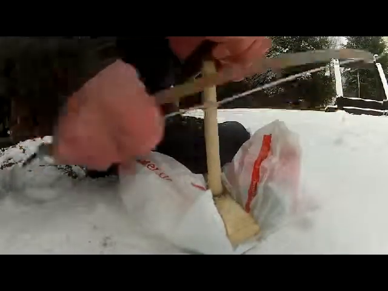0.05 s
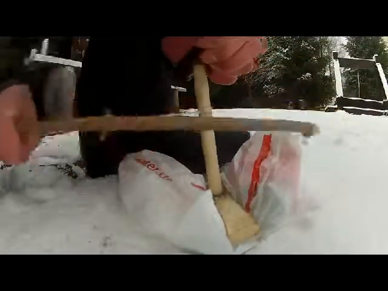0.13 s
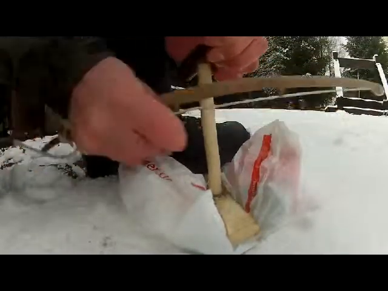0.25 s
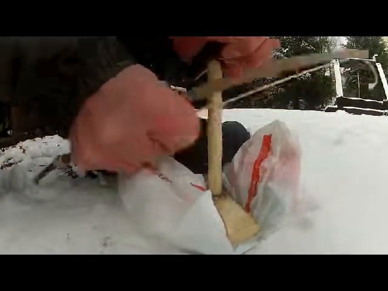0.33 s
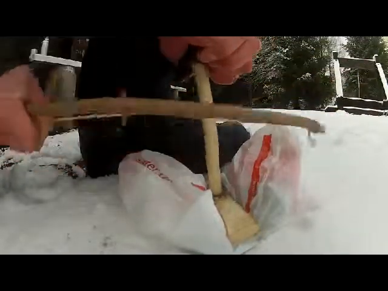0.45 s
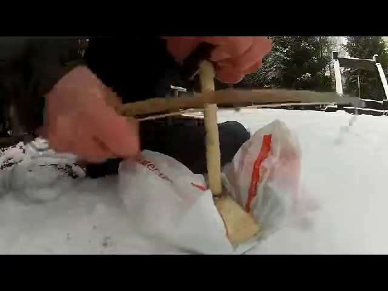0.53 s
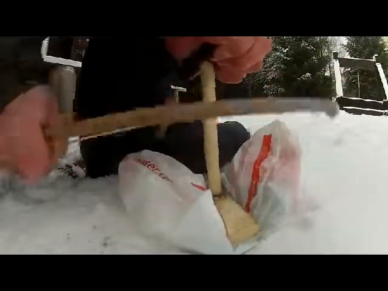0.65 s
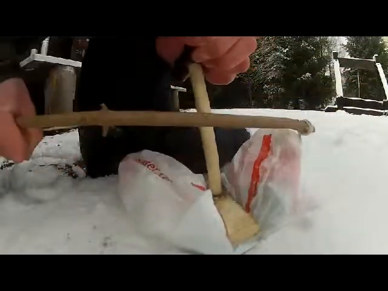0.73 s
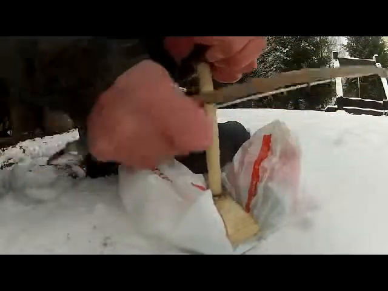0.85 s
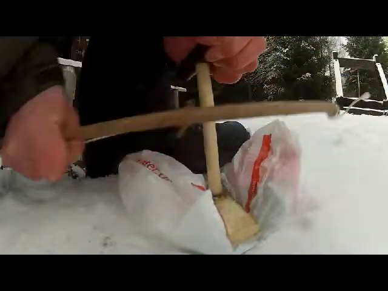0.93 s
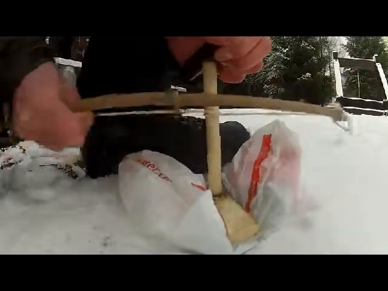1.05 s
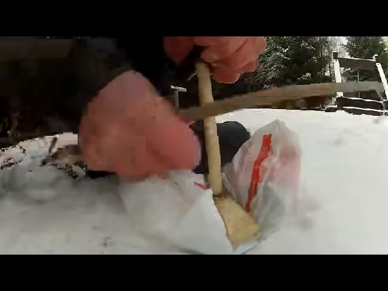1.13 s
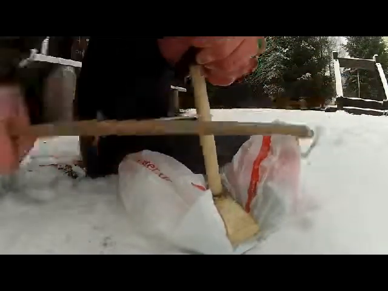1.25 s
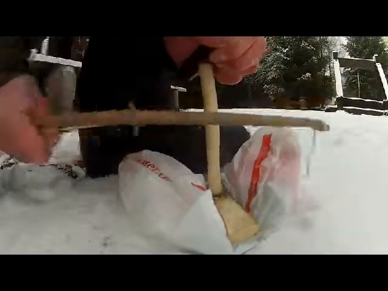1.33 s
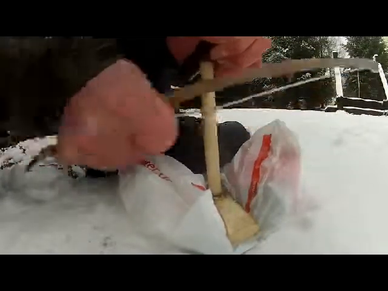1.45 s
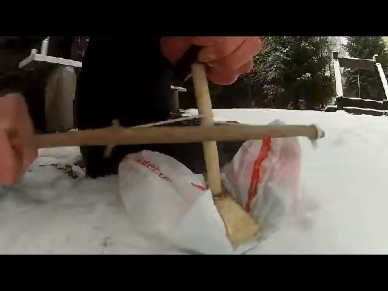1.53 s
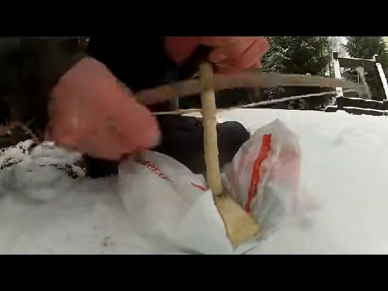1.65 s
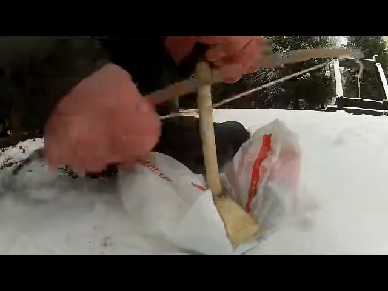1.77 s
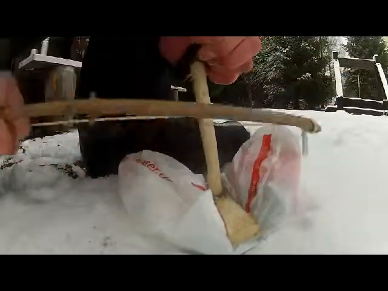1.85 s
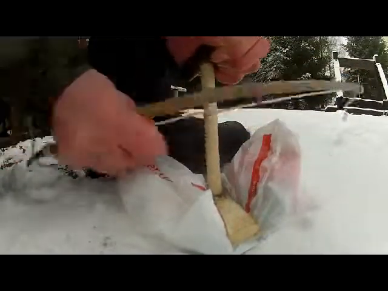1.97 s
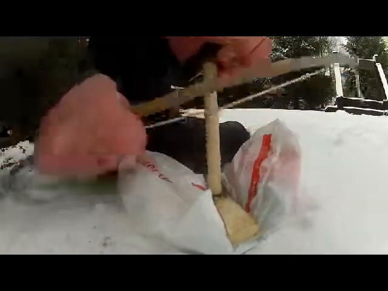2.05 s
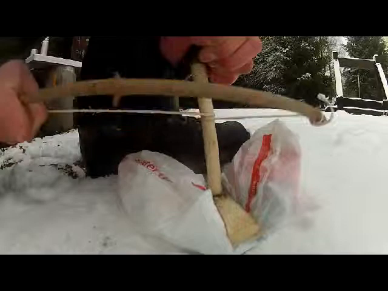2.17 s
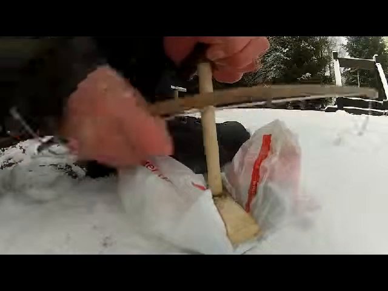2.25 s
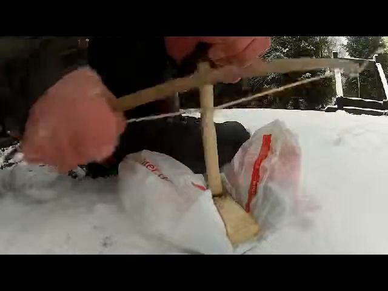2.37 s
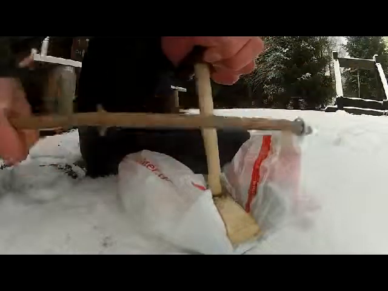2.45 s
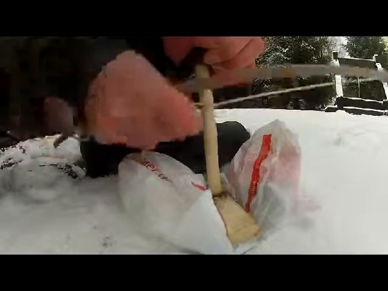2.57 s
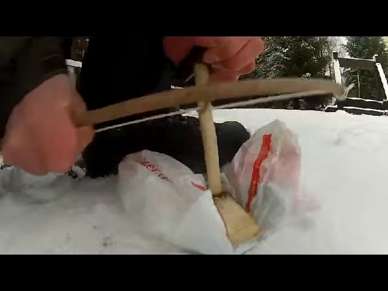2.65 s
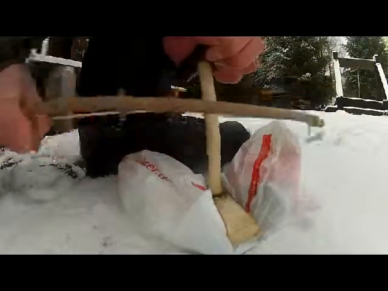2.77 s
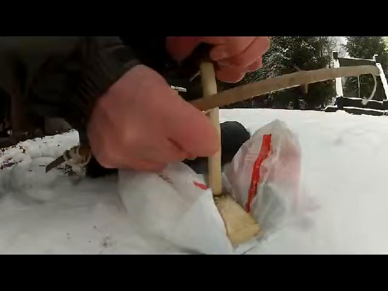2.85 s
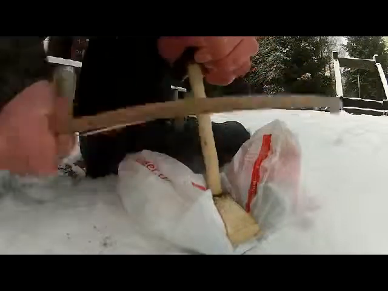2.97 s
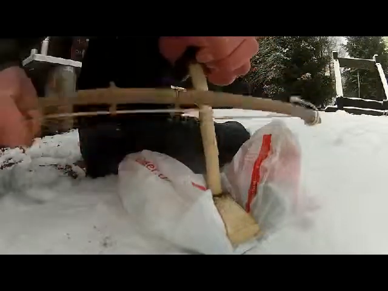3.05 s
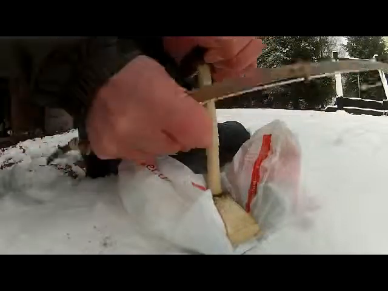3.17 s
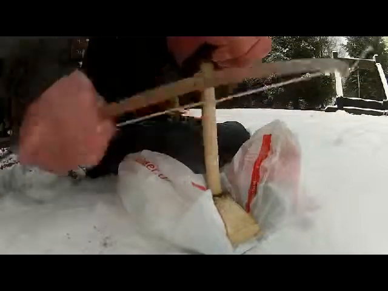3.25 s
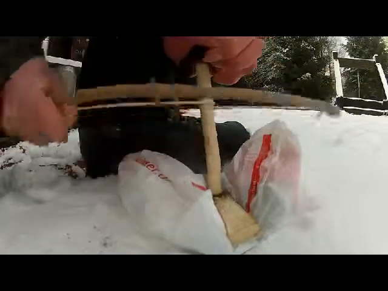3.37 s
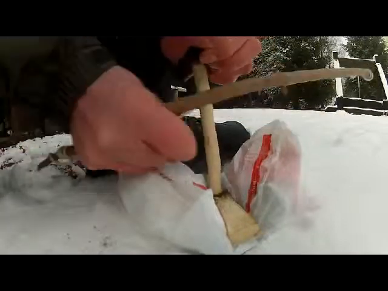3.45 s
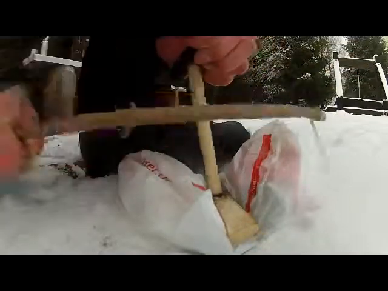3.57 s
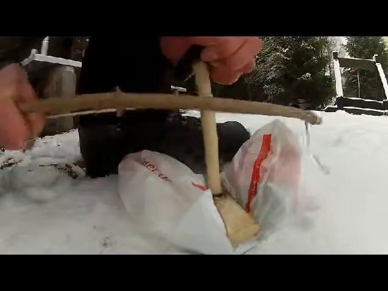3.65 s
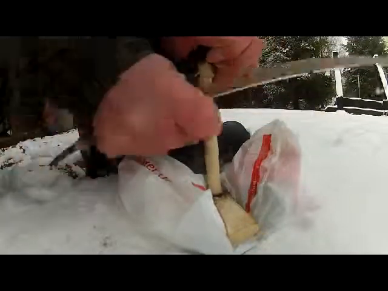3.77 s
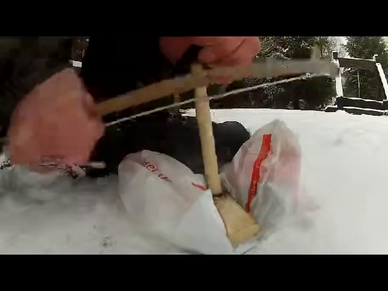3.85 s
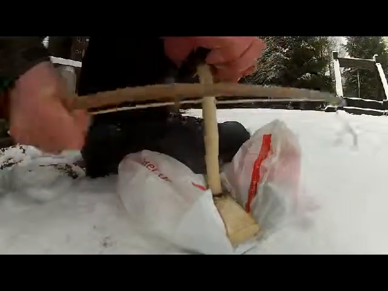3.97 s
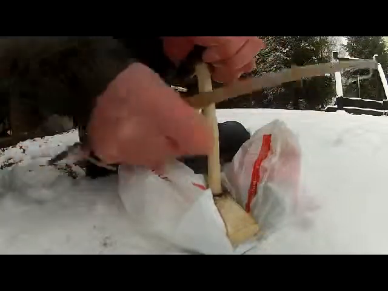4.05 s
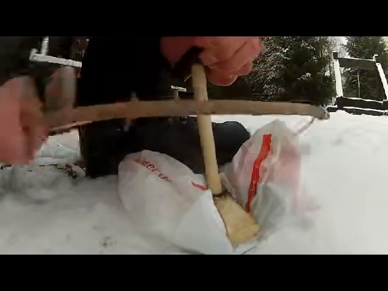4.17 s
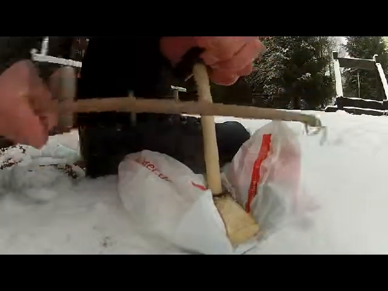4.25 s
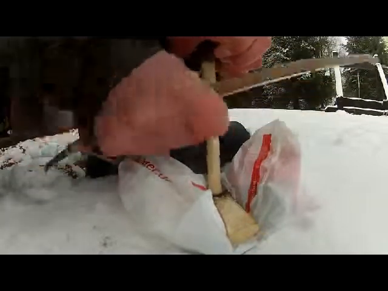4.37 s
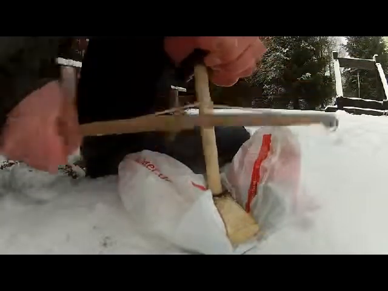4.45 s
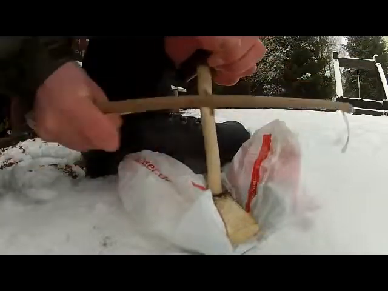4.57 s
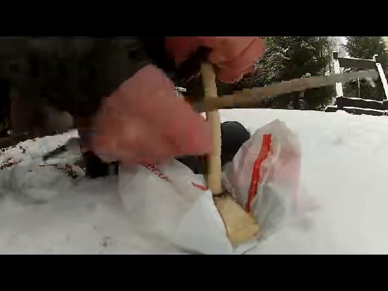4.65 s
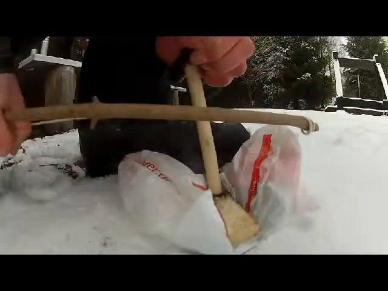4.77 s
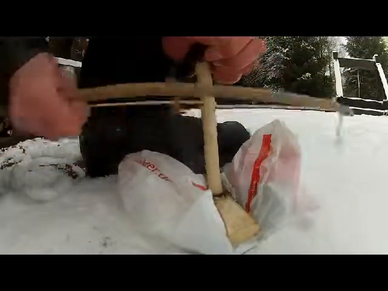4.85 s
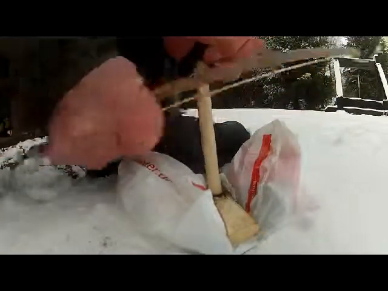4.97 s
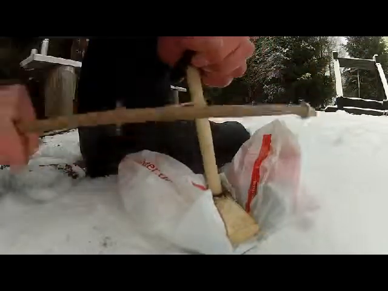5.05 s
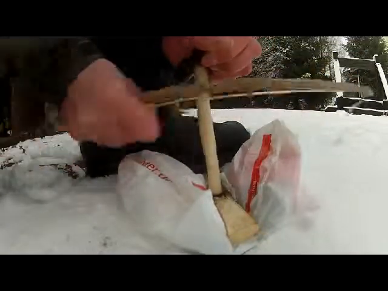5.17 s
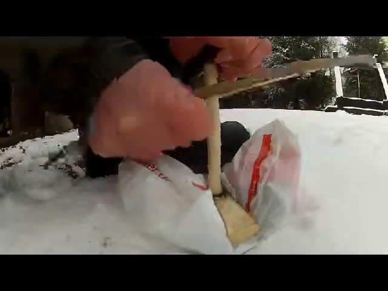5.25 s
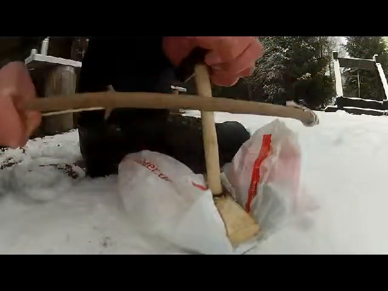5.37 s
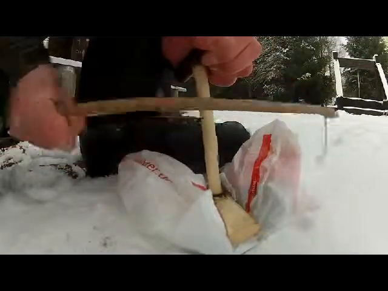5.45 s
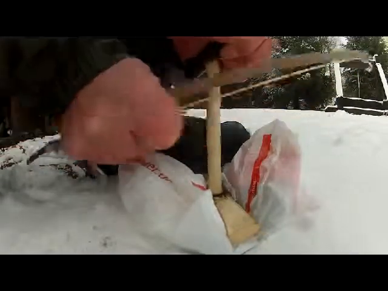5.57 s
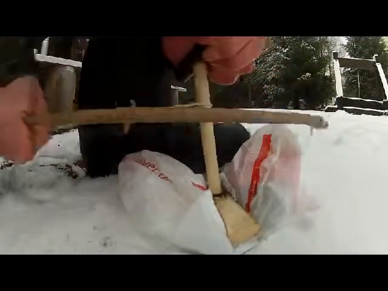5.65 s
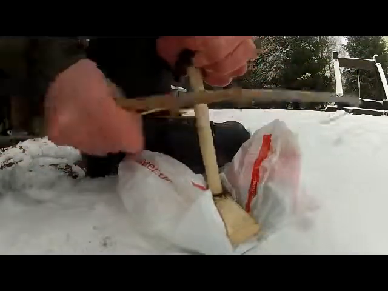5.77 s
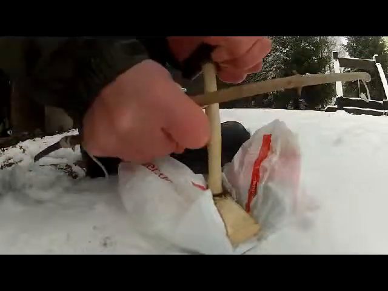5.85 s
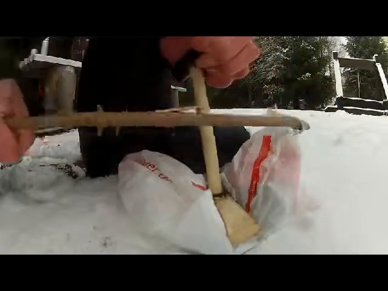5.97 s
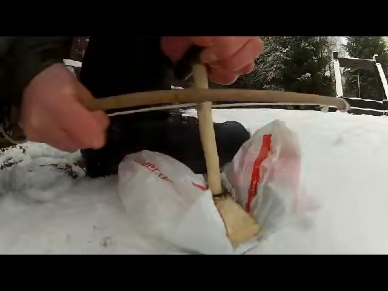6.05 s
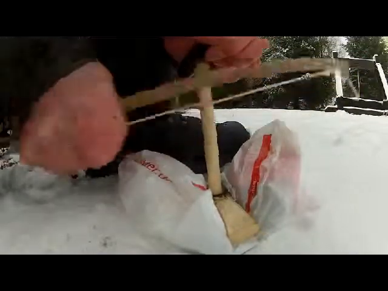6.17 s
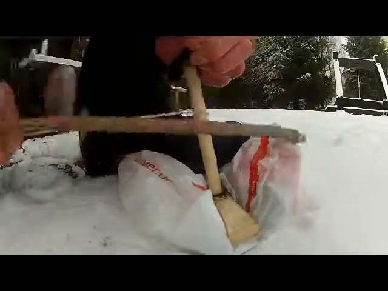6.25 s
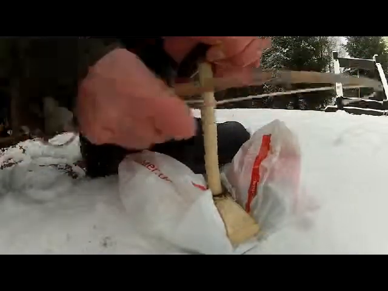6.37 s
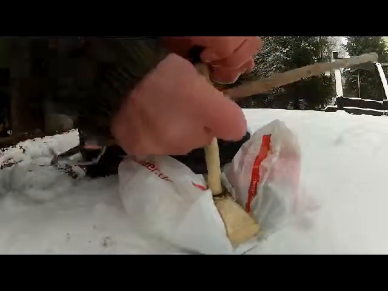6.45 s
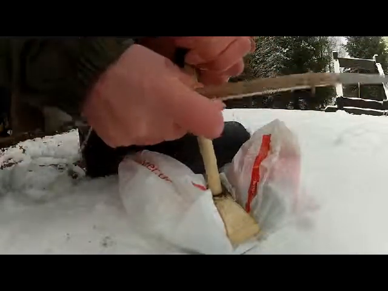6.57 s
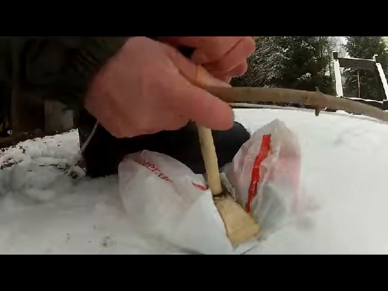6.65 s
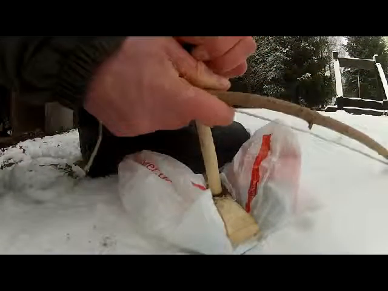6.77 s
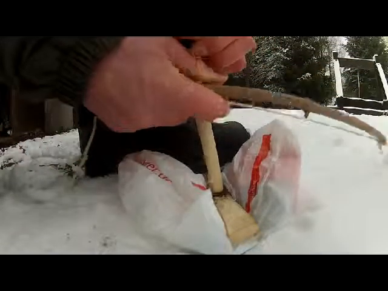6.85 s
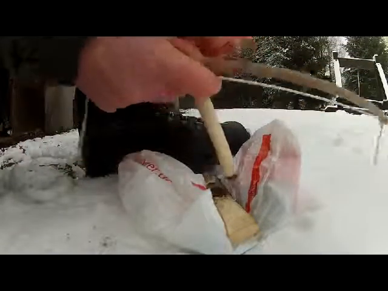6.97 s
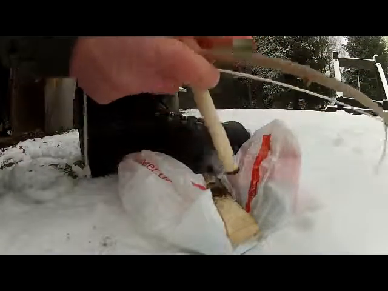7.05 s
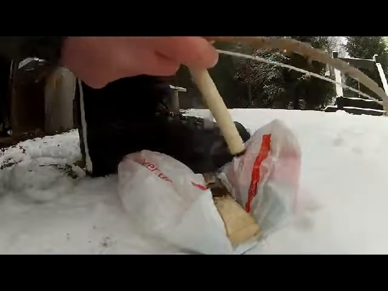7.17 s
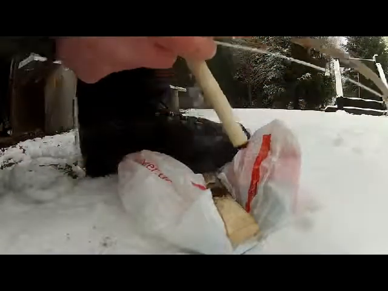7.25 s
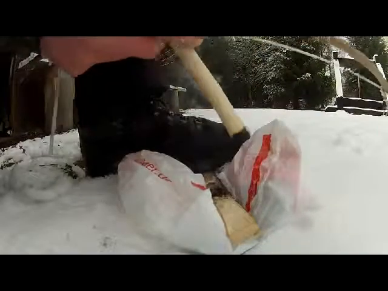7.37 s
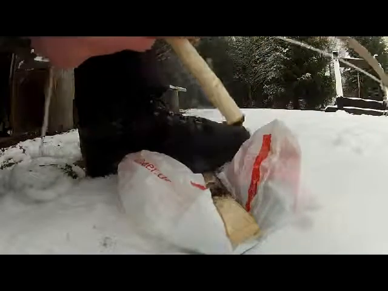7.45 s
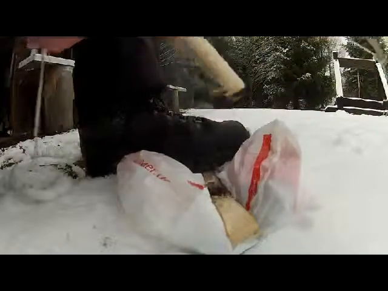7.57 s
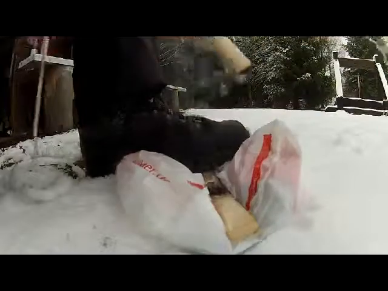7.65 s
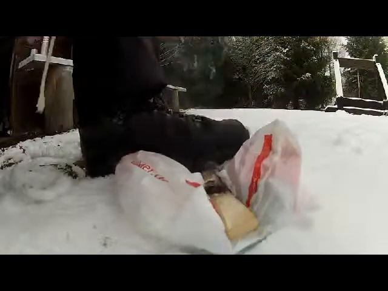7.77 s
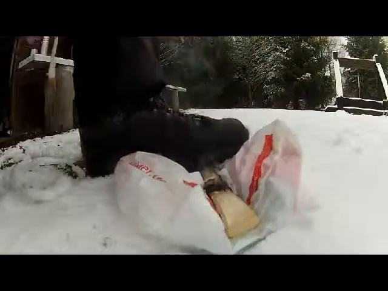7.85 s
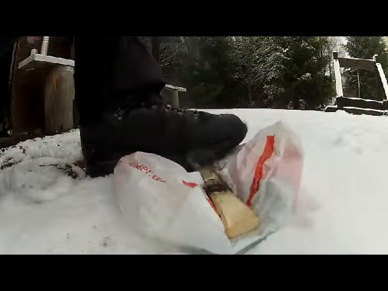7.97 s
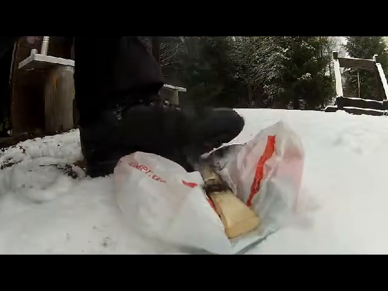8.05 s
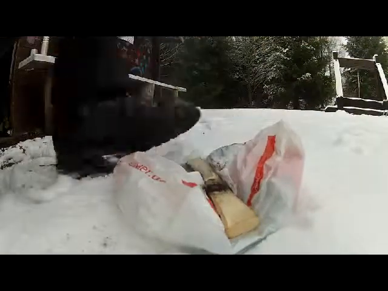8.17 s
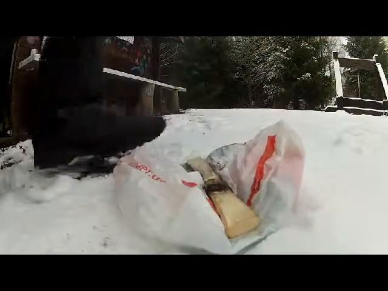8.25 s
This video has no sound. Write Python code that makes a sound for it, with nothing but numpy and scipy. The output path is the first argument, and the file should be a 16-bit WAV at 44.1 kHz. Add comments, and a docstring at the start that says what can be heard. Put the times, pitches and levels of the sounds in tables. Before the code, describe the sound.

From the start, a bow drill works a wooden spindle in a board, close to the microphone in still outdoor air. The strokes are fast and even, about three and a half back-and-forth cycles a second, each strong pull followed by a lighter push. Every stroke makes a low, rough, muffled thrum, with much fainter gritty grinding, wood ringing and cord rubbing. Dull thumps punctuate it, strongest around 0.4, 0.7, 1.8 and 3 seconds. Tiny rising cord squeaks end the pulls. Dry creaks come on every stroke, harder between 3.4 and 6.4 seconds, sharpest near 4.4 and 5. At about 6.5 seconds the bowing stops with a soft knock and a click. The spindle lifts out with a light tick near 6.9 seconds. A jacket sleeve rustles faintly over soft outdoor rumble and hiss, and the board gets one gentle, dull nudge at about 8.1 seconds.

```python
"""A bow drill is worked on a hearth board lying in the snow, close to a small camera.
On each push and pull the spindle sticks and slips in its socket: the board thrums and thumps,
charred dust grinds, the wood creaks and sings faintly, the cord rubs and squeaks.
Then the bow stops, the spindle is lifted out with a tick, a sleeve rustles on in the still air,
and the board is nudged once."""
import sys
import numpy as np
from scipy import signal
from scipy.fft import rfft, irfft
from scipy.io import wavfile
from scipy.ndimage import uniform_filter1d

SR = 44100
rng = np.random.default_rng(int(sys.argv[2]) if len(sys.argv) > 2 else 0)


def wav_record(signal):
    """Record a signal, one row per channel, as 16-bit PCM in the file named by sys.argv[1]."""
    frames = np.transpose(np.atleast_2d(signal))
    bounded = np.clip(frames, -1, 1)
    # unit amplitude maps onto the largest positive 16-bit level
    quanta = np.round(bounded * 32767).astype(np.int16)
    wavfile.write(sys.argv[1], SR, quanta)


N = 366471
TIME_S = np.arange(N) / SR
AGE_S = TIME_S[:4096]   # time within a short burst


def from_db(db):
    """Decibels to gain."""
    return 10 ** (np.asarray(db) / 20)


def unit_rms(x):
    """Scale to unit power."""
    return x / np.sqrt(np.mean(x ** 2) + 1e-20)


def colour(x, spectrum):
    """Minimum-phase filter with the given spectrum; keeps the power of white noise."""
    size = 8192
    hz, db = np.transpose(spectrum)
    bin_hz = np.arange(size // 2 + 1) * SR / size
    gain = unit_rms(from_db(np.interp(np.log(bin_hz + 1), np.log(hz), db)))
    cepstrum = irfft(np.log(gain))[:size // 2]
    cepstrum[1:] *= 2
    response = irfft(np.exp(rfft(cepstrum, size)))
    return signal.fftconvolve(x, response)[:len(x)]


def band(x, hz, width_hz):
    """One resonant band-pass."""
    return signal.lfilter(*signal.iirpeak(hz, hz / width_hz, fs=SR), x)


def resonate(x, modes):
    """Each mode lifts or lowers a narrow band."""
    for hz, width_hz, db in modes:
        x = x + (from_db(db) - 1) * band(x, hz, width_hz)
    return x


def drift(per_s):
    """Random wander between `per_s` knots a second; unit power."""
    knots = rng.standard_normal(4000)
    return unit_rms(np.interp(TIME_S * per_s, np.arange(len(knots)), knots))


def grains(per_s, spread_db):
    """Random clicks of uneven size; unit power."""
    clicks = (rng.random(N) < per_s / SR) * rng.choice([-1, 1], N)
    return unit_rms(clicks * from_db(spread_db * rng.standard_normal(N).clip(-2, 2)))


def crackle(rise_s):
    """Noise burst that swells for `rise_s` and dies."""
    return rng.standard_normal(len(AGE_S)) * AGE_S * np.exp(-AGE_S / rise_s)


def place(out, start_s, peak_db, burst):
    """Mix in a burst at the given time and peak level."""
    at = max(int(start_s * SR), 0)
    out[at:at + len(burst)] += (from_db(peak_db) * burst / np.abs(burst).max())[:N - at]


def each_stroke(strokes, after_s, scatter_s, db, spread_db):
    """One event per stroke, timed from its middle: (time [s], level [dB])."""
    draws = rng.standard_normal((len(strokes), 2)).clip(-2, 2)
    return [(stroke[0] + after_s + scatter_s * late, db + spread_db * loud)
            for stroke, (late, loud) in zip(strokes, draws)]


# strong strokes, bow drawn back: (middle [s], length [s], level [dB])
PULL_STROKES = [(0.128, 0.12, -32.5), (0.416, 0.11, -29.5), (0.687, 0.077, -30.5), (0.965, 0.12, -30.0),
                (1.267, 0.1207, -30.0), (1.539, 0.091, -27.5), (1.837, 0.099, -28.0), (2.129, 0.098, -30.5),
                (2.423, 0.11, -29.0), (2.705, 0.1, -26.5), (3.001, 0.11, -28.5), (3.279, 0.12, -30.5),
                (3.584, 0.11, -30.0), (3.876, 0.11, -31.0), (4.185, 0.1053, -30.5), (4.465, 0.122, -30.0),
                (4.753, 0.12, -31.5), (5.034, 0.094, -28.0), (5.352, 0.098, -27.0), (5.645, 0.13, -35.5),
                (5.95, 0.11, -30.5), (6.221, 0.1, -30.0)]
# lighter strokes forward, all at PUSH_DB: (middle [s], length [s])
PUSH_STROKES = [(0.004, 0.073), (0.272, 0.1), (0.556, 0.094), (0.831, 0.1), (1.117, 0.11), (1.403, 0.11),
                (1.684, 0.11), (1.982, 0.099), (2.274, 0.1), (2.564, 0.128), (2.854, 0.11), (3.138, 0.1),
                (3.427, 0.11), (3.72, 0.12), (4.021, 0.12), (4.317, 0.1276), (4.605, 0.11), (4.888, 0.12),
                (5.185, 0.099), (5.489, 0.12), (5.781, 0.11), (6.075, 0.14), (6.38, 0.14)]
PUSH_DB = -35

def bow(sharpness, lag_s, overrun_s, force_exponent):
    """Envelope of the strokes: each speeds up and stops, weighted by its force (a push is 1)."""
    pushes = [(middle_s, length_s, PUSH_DB) for middle_s, length_s in PUSH_STROKES]
    envelope = np.zeros(N)
    for middle_s, length_s, db in list(PULL_STROKES) + pushes:
        travel = (TIME_S - middle_s - lag_s) / (length_s + 2 * overrun_s)
        moving = np.abs(travel) < .5
        speed = np.cos(np.pi * travel[moving])
        envelope[moving] += from_db(db - PUSH_DB) ** force_exponent * speed ** sharpness
    return envelope


def spindle_slips(per_s, jitter, spread_db, turn_hz, wobble_db):
    """The spindle sticks and lets go unevenly; being out of round, it bites harder once a turn."""
    gaps, sizes = rng.standard_normal((2000, 2)).clip(-2, 2).T
    at = (np.cumsum(np.exp(jitter * gaps)) / per_s * SR).astype(int)
    clicks = np.zeros(N)
    clicks[at[at < N]] = from_db(spread_db * sizes[at < N])
    turn_rad = 2 * np.pi * turn_hz * TIME_S + drift(per_s=7.7)
    return unit_rms(clicks * from_db(wobble_db * np.sin(turn_rad)))


# snow-damped board: (frequency [Hz], gain [dB])
BOARD_SPECTRUM = [(20, -60), (35, -25), (78, -12), (100, -20), (156, 0), (190, 3.5), (240, 4), (280, -1),
                  (321, -7.5), (375, -29.5), (550, -66)]

def board_thrum(slips, gain_db, drag, stiffening):
    """Slips and steady drag shake the board; the hand's pressure keeps it even."""
    effort = bow(sharpness=1.15, lag_s=0, overrun_s=0.001962, force_exponent=1)
    effort = uniform_filter1d(effort, size=441)
    # a harder stroke stiffens the contact and raises the pitch
    pitch_ratio = 1 + stiffening * (np.sqrt(np.abs(effort) / effort.max()) - .7)
    force = unit_rms(slips + drag * rng.standard_normal(N))
    shake = np.interp(np.cumsum(pitch_ratio) % N, np.arange(N), colour(force, BOARD_SPECTRUM))
    local_rms = np.sqrt(uniform_filter1d(shake ** 2, size=1300) + 1e-3)
    return from_db(PUSH_DB + gain_db) * unit_rms(shake / local_rms) * effort


# ringing of spindle and board: (frequency [Hz], width [Hz], gain [dB])
WOOD_RESONANCES = [(692, 30, 7), (930, 50, 7), (1182, 70, 5), (2310, 90, 5), (3075, 140, 4), (3520, 160, 2)]
# crushed dust: (frequency [Hz], gain [dB])
CRUNCH_SPECTRUM = [(200, -31), (400, 2.5), (800, -7.5), (1050, -7.5), (1400, 1.5), (1650, -2),
                   (1900, -22.5), (3500, -18), (5000, -27.5), (15000, -24.5)]
# woody rasp: (frequency [Hz], gain [dB])
RASP_SPECTRUM = [(200, -12.5), (400, 2), (650, 0), (900, -4), (1250, -11), (2000, -8), (5000, -41.5)]

def dust_grinding(slips, level_db, rasp_db, burst_s, steady):
    """Each slip crushes charred dust in the socket; heavy strokes add a deeper rasp."""
    bursts = unit_rms(signal.lfilter([1], [1, -np.exp(-1 / (burst_s * SR))], slips))
    crunch = colour(grains(per_s=5500, spread_db=4) * (bursts + steady), CRUNCH_SPECTRUM)
    crunch = unit_rms(resonate(crunch, WOOD_RESONANCES))
    crunch *= bow(sharpness=1.16, lag_s=-0.0064, overrun_s=0.017, force_exponent=0.05)
    rasp = colour(grains(per_s=2400, spread_db=2), RASP_SPECTRUM)
    rasp = unit_rms(resonate(rasp, WOOD_RESONANCES))
    rasp *= bow(sharpness=5.3, lag_s=-0.001, overrun_s=0.0024, force_exponent=0.99)
    return from_db(level_db) * (crunch + from_db(rasp_db) * rasp)


def wood_singing(level_db, patchy_db, rough_db):
    """Friction rings the wood's modes; as the spindle shifts, now one stands out, now another."""
    out = np.zeros(N)
    for hz, width_hz, _ in WOOD_RESONANCES:
        ring = unit_rms(band(grains(per_s=1500, spread_db=3), hz, width_hz))
        out += ring * from_db(patchy_db * drift(per_s=16).clip(-2, 2) + rough_db * drift(per_s=130))
    envelope = bow(sharpness=1, lag_s=0.0035, overrun_s=0.015, force_exponent=0.36)
    return from_db(level_db) * unit_rms(out) * envelope


# cord on wood: (frequency [Hz], gain [dB])
CORD_SPECTRUM = [(600, -7.5), (1500, -3.5), (2300, 7.5), (2650, 0.5), (3100, 5), (4400, -12.5),
                 (5300, -6.5), (7000, -11), (9000, -6), (10700, -19.5), (11600, -19), (13300, -25.5),
                 (15000, -12.5)]

def cord_rub(level_db, flutter_db):
    """Cord fibres rub over the turning spindle."""
    fibres = grains(per_s=14000, spread_db=3) * from_db(flutter_db * drift(per_s=160))
    envelope = bow(sharpness=1.1, lag_s=0.012, overrun_s=0.015, force_exponent=0.61)
    return from_db(level_db) * unit_rms(colour(fibres, CORD_SPECTRUM)) * envelope


# rustle contour, steady while the arm works: (time [s], level [dB])
SLEEVE_CONTOUR = [(0, -64), (6.35, -66), (6.55, -71.5), (7.4, -72), (7.6, -66.5), (7.8, -65), (8.05, -70),
                  (8.31, -70)]
# jacket cloth: (frequency [Hz], gain [dB])
SLEEVE_SPECTRUM = [(300, -8), (1000, -4), (1750, -2.5), (2200, 3), (2900, -1), (4000, -5), (5200, -9),
                   (7000, -8.5), (9500, -12), (12000, -41), (15000, -11.5)]

def sleeve_rustle(gain_db, flutter_db, snap, swell_db):
    """Stiff cloth brushes as the arm moves; folds snap over at random."""
    level_db = gain_db + np.interp(TIME_S, *np.transpose(SLEEVE_CONTOUR))
    level_db += flutter_db * drift(per_s=93) + swell_db * drift(per_s=8.3)
    fibres = grains(per_s=6000, spread_db=2)
    folds = snap * grains(per_s=70, spread_db=2.5)
    return from_db(level_db) * colour(unit_rms(fibres + folds), SLEEVE_SPECTRUM)


# outdoor air: (frequency [Hz], gain [dB])
AIR_SPECTRUM = [(25, -1.5), (50, -15), (90, -1.5), (120, -6.5), (230, -4.5), (400, -10.5), (800, -19.5),
                (2200, -24), (4300, -31.5), (7500, -36.5), (15000, -53.5)]

def still_air(level_db, waver_db):
    """Soft outdoor rumble and hiss."""
    return from_db(level_db + waver_db * drift(per_s=11)) * colour(rng.standard_normal(N), AIR_SPECTRUM)


# hard catches in the socket: (time [s], level [dB], treble gain [dB])
HARD_CREAKS = [(0.29, -47, -8), (0.401, -45, -1), (1.245, -46, -3), (1.656, -47.5, 3), (2.664, -43, -1),
               (3.418, -40.5, -5), (3.737, -42.5, 4), (3.855, -37, -1), (4.011, -40.5, -12),
               (4.329, -41.5, 14), (4.443, -32.5, 10), (5.007, -38, 6), (5.013, -36, 10), (5.342, -49, 14),
               (5.482, -39, 0), (5.778, -40.5, 15), (6.088, -41, 5), (6.149, -45, -5), (6.36, -41.5, 3)]
# dry crack: (frequency [Hz], gain [dB])
CREAK_SPECTRUM = [(200, -44), (500, 4), (900, -2.5), (1300, 7.5), (1650, 3.5), (1950, -9.5), (2300, -2),
                  (3500, -18.5), (5500, -27), (9500, -22), (12000, -25.5), (15000, -22.5)]

def spindle_creaks(gain_db, rise_s, treble_hz, light_treble_db):
    """The spindle catches and tears loose: lightly on every stroke, on some much harder."""
    light = each_stroke(PULL_STROKES, after_s=-0.012, scatter_s=0.012, db=-46.5, spread_db=2)
    light += each_stroke(PUSH_STROKES, after_s=0.0018, scatter_s=0.012, db=-46.5, spread_db=2)
    light = [(start_s, db, light_treble_db) for start_s, db in light]
    out = np.zeros(N)
    for start_s, db, treble_db in light + HARD_CREAKS:
        crack = resonate(colour(crackle(rise_s), CREAK_SPECTRUM), WOOD_RESONANCES)
        treble = signal.lfilter(*signal.butter(1, treble_hz, "high", fs=SR), crack)
        place(out, start_s, db + gain_db, crack + (from_db(treble_db) - 1) * treble)
    return out


# spindle knocks; last, a nudge of the board: (time [s], level [dB])
BOARD_KNOCKS = [(0.402, -28.5), (0.675, -27.5), (1.247, -32), (1.809, -29), (2.997, -25.5), (3.593, -31),
                (4.279, -37), (4.389, -36.5), (6.151, -44), (6.455, -38), (6.655, -48.5), (8.125, -46)]

def board_thumps(gain_db):
    """Spindle jolts ring the board: lightly as the bow turns after a push, now and then hard."""
    jolts = each_stroke(PUSH_STROKES[:-1], after_s=0.072, scatter_s=0.0097, db=-43, spread_db=3.5)
    impulses = np.zeros(N)
    for start_s, db in BOARD_KNOCKS + jolts:
        impulses[int(start_s * SR)] += from_db(db + gain_db)
    response = colour(signal.unit_impulse(N), BOARD_SPECTRUM)
    return colour(impulses, BOARD_SPECTRUM) / np.abs(response).max()


# loudest cord squeaks: (time [s], level [dB], pitch [Hz])
LOUD_SQUEAKS = [(0.472, -46, 1320), (1.593, -47, 1145), (3.791, -47.5, 1177), (5.089, -46, 1247),
                (5.573, -48.5, 1170), (5.711, -47, 1656)]

def cord_squeaks(gain_db, rise_s, glide_per_s, light_hz):
    """Fast stick-slip of the cord, mostly as a pull runs out: a short, rough, rising chirp."""
    light = each_stroke(PULL_STROKES, after_s=0.055, scatter_s=0.0027, db=-56, spread_db=0.5)
    light = [(start_s, db, light_hz) for start_s, db in light]
    envelope = AGE_S * np.exp(-AGE_S / rise_s)
    out = np.zeros(N)
    for start_s, db, hz in light + LOUD_SQUEAKS:
        roughness = rng.standard_normal(len(AGE_S))
        pitch_hz = hz * (1 + glide_per_s * (AGE_S - rise_s) + roughness)
        place(out, start_s, db + gain_db, np.sin(2 * np.pi * np.cumsum(pitch_hz) / SR) * envelope)
    return out


# handling of bow and spindle: (time [s], level [dB])
HANDLING_TICKS = [(0.474, -50), (2.185, -40.5), (6.489, -47), (6.496, -44), (6.892, -42.5), (6.9, -49)]
# wood on wood: (frequency [Hz], gain [dB])
TICK_SPECTRUM = [(300, -5), (900, -1.5), (1300, 0), (1700, -4.5), (2300, 5), (3500, -11), (4500, -17),
                 (9500, -14.5), (12000, -29), (15000, -22)]

def wood_ticks(gain_db, rise_s):
    """Wood touches wood with a light, bright click."""
    out = np.zeros(N)
    for start_s, db in HANDLING_TICKS:
        tick = resonate(colour(crackle(rise_s), TICK_SPECTRUM), WOOD_RESONANCES)
        place(out, start_s, db + gain_db, tick)
    return out


# catches of the sleeve: (middle [s], level [dB], half length [s])
SLEEVE_CATCHES = [(1.169, -64, 0.018), (2.027, -57.5, 0.013), (4.55, -59.5, 0.0066), (6.271, -61.5, 0.042)]
# scuffed cloth: (frequency [Hz], gain [dB])
SCUFF_SPECTRUM = [(800, 0), (2000, -3), (3600, 6), (5500, -0.5), (7300, -1), (8600, -1), (10000, -23),
                  (15000, -25)]

def sleeve_scuffs(gain_db):
    """The cloth catches in brief, brighter swishes."""
    envelope = sum(from_db(db + gain_db) / (1 + ((TIME_S - middle_s) / half_s) ** 4)
                   for middle_s, db, half_s in SLEEVE_CATCHES)
    return envelope * colour(grains(per_s=9200, spread_db=8), SCUFF_SPECTRUM)


def scene():
    """All close and central; only faint noise differs between left and right."""
    slips = spindle_slips(per_s=73, jitter=.25, spread_db=2.5, turn_hz=35.27, wobble_db=2.5)
    mid = board_thrum(slips, gain_db=-0.31, drag=0.66, stiffening=.25)
    mid += dust_grinding(slips, level_db=-58, rasp_db=-2, burst_s=0.0033, steady=0.26)
    mid += wood_singing(level_db=-63.5, patchy_db=6.5, rough_db=2)
    mid += cord_rub(level_db=-60.5, flutter_db=2.5)
    mid += sleeve_rustle(gain_db=-1.1, flutter_db=2, snap=0.44, swell_db=0.64)
    mid += still_air(level_db=-63, waver_db=1)
    mid += spindle_creaks(gain_db=5, rise_s=0.0016, treble_hz=2940, light_treble_db=-1)
    mid += board_thumps(gain_db=3)
    mid += cord_squeaks(gain_db=1.5, rise_s=0.002, glide_per_s=10, light_hz=1210)
    mid += wood_ticks(gain_db=0, rise_s=0.0014)
    mid += sleeve_scuffs(gain_db=4)
    side = dust_grinding(slips, level_db=-80.5, rasp_db=-23, burst_s=0.0048, steady=0.7)
    side += cord_rub(level_db=-83, flutter_db=6)
    side += sleeve_rustle(gain_db=-11.5, flutter_db=2, snap=.2, swell_db=1.2)
    side += still_air(level_db=-80, waver_db=1.7)
    return np.array([mid + side, mid - side])


# camera case around the microphone: (frequency [Hz], width [Hz], gain [dB])
CASE_RESONANCES = [(2580, 360, -6), (6005, 350, -20), (6060, 260, 2), (7560, 870, -4), (9100, 190, 5),
                   (9240, 460, -7), (9960, 200, 11.5), (10050, 360, -17), (10630, 310, 8), (12700, 460, -7),
                   (13200, 390, -4), (13700, 370, 7), (14500, 300, -4), (15100, 250, -7)]
RIPPLE_HZ, CUTOFF_HZ = 12000, 15300

def record(dry):
    """The case colours the sound; a faint gain ripple mirrors bass into the treble; the top is cut."""
    ripple = 1 + from_db(-29.5) * np.cos(2 * np.pi * RIPPLE_HZ * TIME_S)
    lowpass = signal.ellip(12, .1, 80, CUTOFF_HZ, fs=SR, output="sos")
    return signal.sosfilt(lowpass, resonate(dry, CASE_RESONANCES) * ripple)


dry = scene()
out = record(dry)
wav_record(out)
```